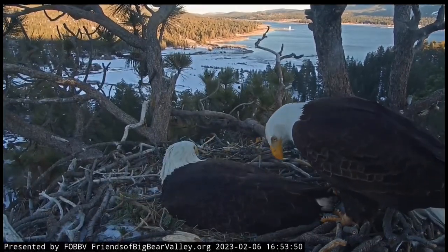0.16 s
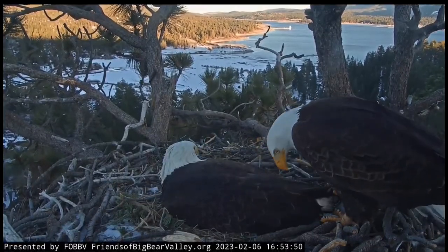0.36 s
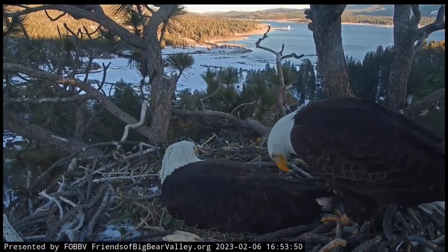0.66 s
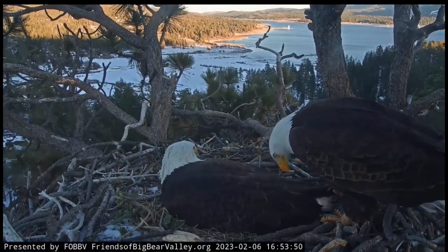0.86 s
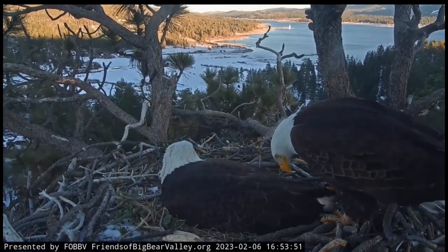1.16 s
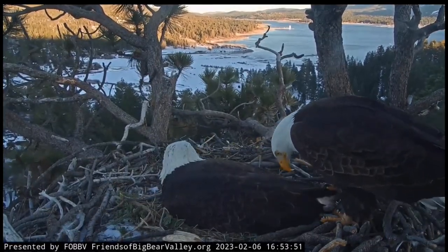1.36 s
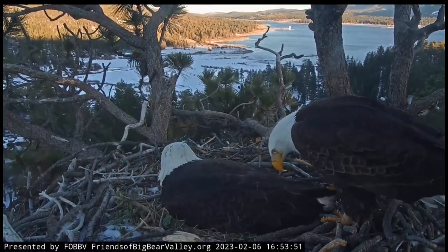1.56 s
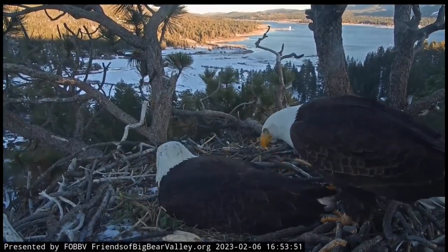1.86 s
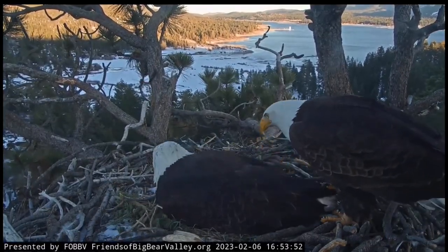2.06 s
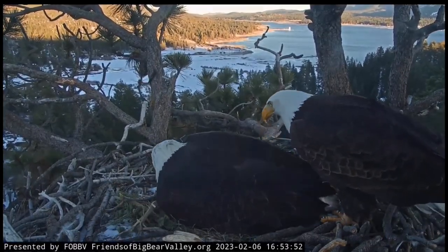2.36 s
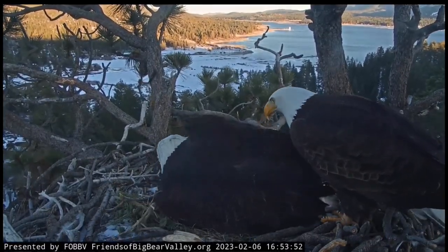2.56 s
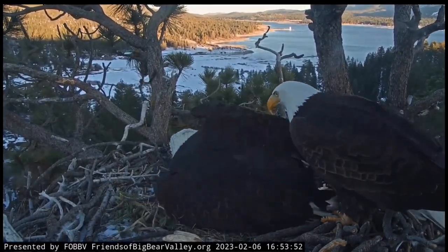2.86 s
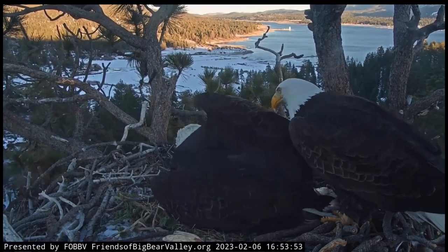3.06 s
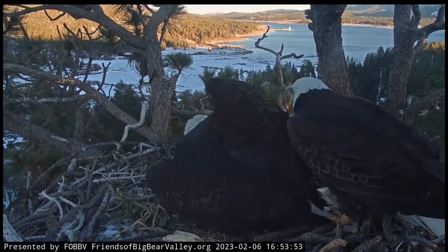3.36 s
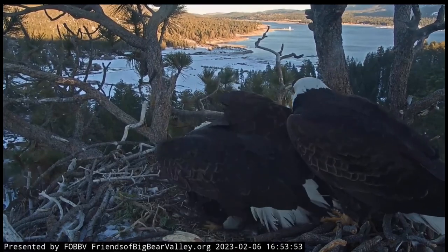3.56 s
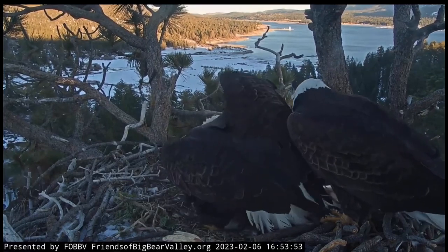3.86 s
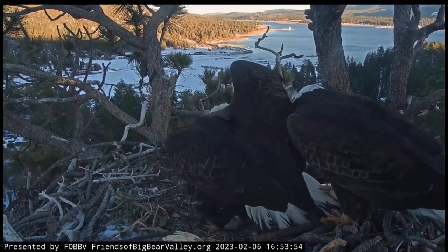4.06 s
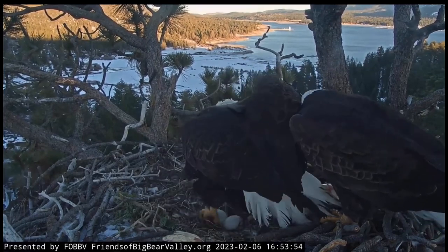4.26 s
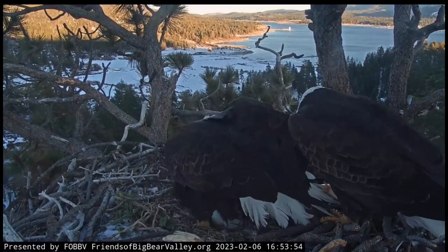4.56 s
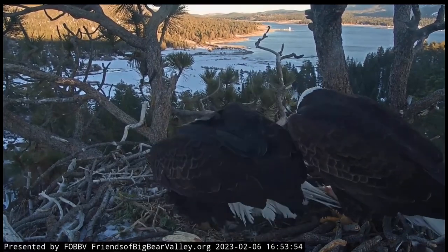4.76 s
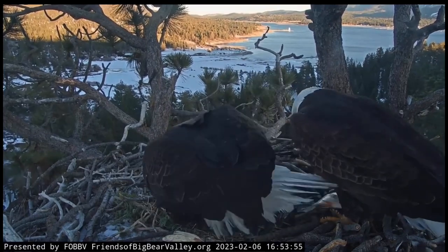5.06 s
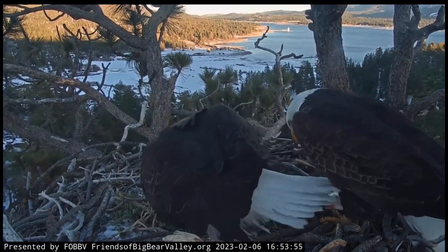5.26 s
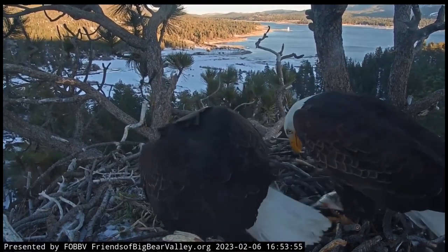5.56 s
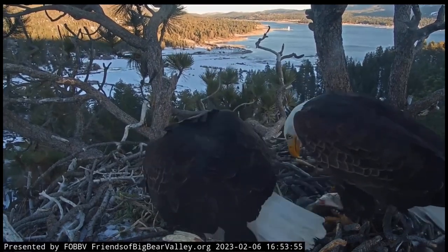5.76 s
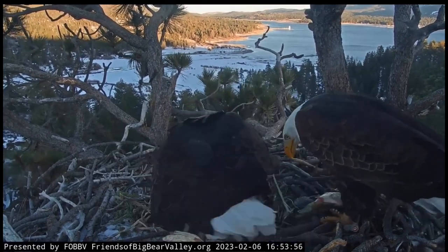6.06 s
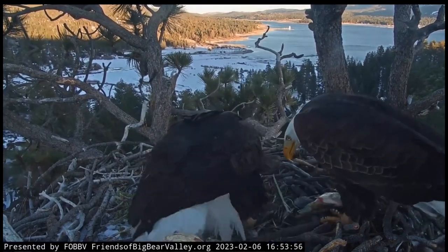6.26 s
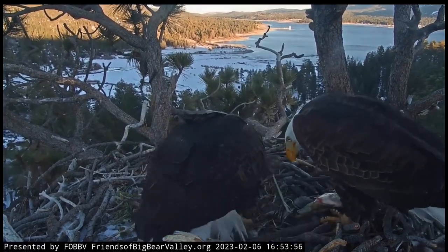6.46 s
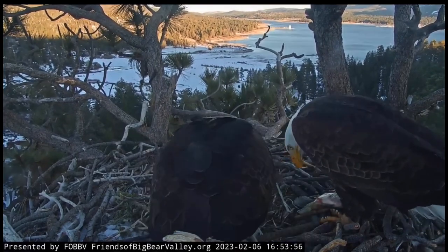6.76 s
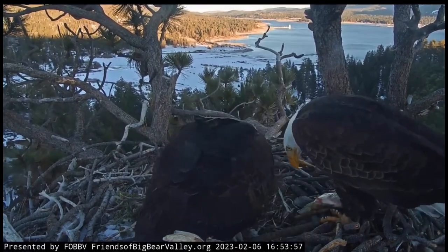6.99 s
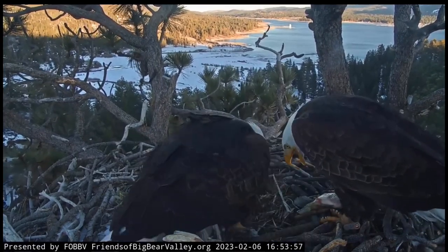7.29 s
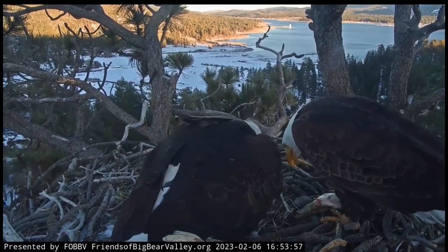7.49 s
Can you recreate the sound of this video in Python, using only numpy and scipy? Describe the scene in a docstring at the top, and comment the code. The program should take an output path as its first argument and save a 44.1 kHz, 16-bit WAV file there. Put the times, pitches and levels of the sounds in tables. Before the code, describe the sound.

Outdoor nest, heard very near: high nasal eagle whines with short gaps, smooth at first, then increasingly raspy. A mid-way cry cracks into a higher, ragged squeal, followed by soft chirps and crisp stick cracks. The calling resumes strongly, and a second eagle swells in at the end. Gentle wind and constant hiss continue throughout, with only a faint scattered tail from the trees and slight overload on the peaks.

```python
"""Two eagles at the nest

Two bald eagles call close to the nest microphone. One gives rising whines, each a stack of partials roughened
by a second, lower vibration; one whine breaks into a squeal, and the mate swells in under the last.
Soft falling chirps are gliding partials; sticks snap in bursts of noise as a bird turns round.
Soft wind and a steady hiss, both shaped noise, lie beneath; the loudest calls overload the microphone."""
import sys
import numpy as np
from scipy import signal
from scipy.fft import rfft, irfft, next_fast_len
from scipy.io import wavfile
from scipy.ndimage import map_coordinates

SR = 44100
rng = np.random.default_rng(int(sys.argv[2]) if len(sys.argv) > 2 else 0)


def to_wav(s):
    """Save 16-bit WAV."""
    ch = np.atleast_2d(s).T  # columns
    pcm = np.round(np.clip(ch, -1, 1) * 32767)  # PCM
    wavfile.write(sys.argv[1], SR, pcm.astype(np.int16))


N = 336476


def amp(db):
    """Decibels to gain."""
    return 10 ** (np.asarray(db) / 20)


def unit(x):
    """Scale to rms 1."""
    return x / np.sqrt(np.mean(x ** 2) + 1e-20)


def along(points, hz):
    """Read a value off (frequency, value) points, on a log frequency axis."""
    f, v = np.transpose(points)
    return np.interp(np.log(hz + 1), np.log(f + 1), v)


def curves(rows):
    """One value per sample for each column after the time."""
    s, *cols = np.transpose(rows)
    return [np.interp(np.arange(N) / SR, s, c) for c in cols]


def gate(start, end, fade):
    """1 between two times, with straight fades centred on them."""
    t = np.arange(N) / SR
    opening = np.clip((t - start) / fade + .5, 0, 1)
    closing = np.clip((end - t) / fade + .5, 0, 1)
    return opening * closing


def bump(s, length):
    """A smooth rise to 1 and back, centred on a time; length is the width at 1/e."""
    return np.exp(-(2 * (np.arange(N) / SR - s) / length) ** 2)


def wobble(rate):
    """A smooth random curve, rate knots a second."""
    knots = rng.standard_normal(int(N * rate / SR) + 4)
    return map_coordinates(knots, [np.arange(N) * rate / SR])


def filtered(x, response):
    """Multiply the spectrum of x by a response of frequency."""
    m = next_fast_len(N + SR // 2)
    return irfft(rfft(x, m) * response(np.fft.rfftfreq(m, 1 / SR)), m)[:N]


def noise(spectrum):
    """Coloured noise of rms 1."""
    return unit(filtered(rng.standard_normal(N), lambda hz: amp(along(spectrum, hz))))


def cycle(pitch):
    """Running phase of a vibration."""
    return 2 * np.pi * np.cumsum(pitch) / SR


def tone(phase):
    """A partial of rms 1."""
    return np.sqrt(2) * np.cos(phase)


def background(air_db=-33, hiss_db=-39):
    """Soft wind in the pines, mostly low noise, under a steady higher hiss."""
    # spectrum of the wind: (frequency [Hz], relative density [dB])
    air_spectrum = [(12, -37), (20, -0.5), (53, 1), (92, 0), (231, -8.5), (303, -9.5), (561, -6),
                    (908, -5.5), (1040, -7.5), (1240, -8), (1310, -10.5), (1620, -12.5), (2000, -22),
                    (2600, -54), (4400, -120)]
    # spectrum of the hiss: (frequency [Hz], relative density [dB])
    hiss_spectrum = [(1200, 2), (2000, 5.5), (2800, 6), (3700, 10), (4400, -4), (5100, -8.5), (6000, -17.5),
                     (7500, -20.5), (10000, -26.5), (14000, -24), (16000, -33.5)]
    wind = amp(air_db + 0.17 * wobble(1)) * noise(air_spectrum)
    hiss = amp(hiss_db + 0.4 * wobble(4.43)) * noise(hiss_spectrum)
    return wind + hiss


def forest(x):
    """Trunks and branches scatter a short tail: noise that dies away at its own rate in each band."""
    # decay of the tail: (frequency [Hz], time to fall 60 dB [s])
    decay_times = [(300, .3), (3000, 0.33), (10000, 0.052)]
    hz, t, z = signal.stft(rng.standard_normal(SR // 2), SR, nperseg=256)
    decay = amp(-60 * t / along(decay_times, hz)[:, None])
    tail = signal.istft(z * decay, SR, nperseg=256)[1]
    return signal.fftconvolve(x, tail / np.linalg.norm(tail))[:N]


def sticks(t60=0.031, level_db=-4):
    """Each dry twig gives one brief crack: noise with a sharp edge and a fast exponential decay."""
    # snaps at the nest: (time [s], relative level [dB])
    snaps = [(.763, -28), (2.399, -32), (4.416, -18.5), (4.778, -26.5), (5.317, -18.5), (5.336, -11.5),
             (6.798, -26)]
    # colour of breaking wood: (frequency [Hz], relative density [dB])
    stick_spectrum = [(300, -23), (1200, -7.5), (2200, -11.5), (3600, -1), (5000, -17), (7500, -28),
                      (11000, -46.5), (15000, -53.5)]
    t, blows = np.arange(N) / SR, np.zeros(N)
    for s, db in snaps:
        age = np.maximum(t - s, 0)
        edge = 1 - np.exp(-age / 0.00024)
        blows += amp(db - 60 * age / t60) * edge
    return amp(level_db) * blows * noise(stick_spectrum)


def chirps():
    """Short, soft notes of three partials that slide down with a ragged pitch and level."""
    # falling notes: (start [s], length [s], start pitch [Hz], end pitch [Hz],
    # first partial [dB], second partial [dB], third partial [dB])
    notes = [(4.227, 0.025, 1327, 1078, -33, -28, -30), (4.654, 0.022, 3800, 3560, -38.5, -68, -85),
             (5.139, 0.046, 4040, 3430, -30, -67, -83), (5.196, 0.039, 1333, 1103, -30, -28, -36)]
    t, out = np.arange(N) / SR, np.zeros(N)
    for s, length, start_hz, end_hz, *partials in notes:
        pitch = np.interp(t, [s, s + length], [start_hz, end_hz])
        phase = cycle(pitch * (1 + 0.02 * wobble(660)))
        swell = gate(s, s + length, fade=length / 5) * amp(4.8 * wobble(150))
        out += swell * sum(amp(db) * tone(k * phase) for k, db in enumerate(partials, 1))
    return out


def glide(start, end, onset_hz, low_hz, top_hz, bend, scoop_hz):
    """Pitch of a call: it settles, scoops, climbs as the bird presses and drops as it lets go."""
    settle_s, scoop_at_s, scoop_width_s = .05, .09, 0.041
    drop_s, drop_share = .055, .15
    t = np.arange(N) / SR
    age = np.maximum(t - start, 0)
    climb = np.clip(age / (end - start - drop_s), 0, 1) ** bend
    settling = onset_hz * np.exp(-age / settle_s)
    scoop = scoop_hz * np.exp(-((age - scoop_at_s) / scoop_width_s) ** 2)
    letting_go = np.clip((t - end) / drop_s + 1, 0, 1) ** 2
    return (low_hz + (top_hz - low_hz) * climb + settling - scoop) * (1 - drop_share * letting_go)


def whine(pitch, effort_db, rasp_db, share, low_db, partial_db, jitter, low_jitter=0.0422, shimmer_db=1.02,
          side_db=-0.87, flutter_db=2, waver=0.001454):
    """The syrinx sings a clean stack; under strain a second vibration adds fuzzy side tones between partials."""
    # fixed resonances that the first three partials glide through: (frequency [Hz], gain [dB])
    throat = [(1075.0, -11.7), (1130.0, -3.2), (1185.0, -1.5), (1250.0, -3.9), (1330.0, 3.6), (1410.0, 1.7),
              (2150.0, -1.9), (2250.0, -4.9), (2320.0, -11.2), (2400.0, -9.9), (2480.0, -6.9),
              (2600.0, -4.4), (2700.0, 4.2), (2800.0, 7.2), (3220.0, -2.2), (3600.0, -6.8), (4250.0, -5.9)]
    # slope of the fourth to tenth partials: (frequency [Hz], relative level [dB])
    overtone_slope = [(4350, -16.5), (4800, -21.5), (5400, -29), (6100, -39), (7000, -40.5), (8200, -50),
                      (10000, -59), (13000, -68.5)]
    # mixtures of both vibrations: (multiple of the pitch [-], sign of the low voice [-], relative level [dB])
    side_tones = [(1, 1, -13.5), (2, -1, -11.5), (2, 1, 0), (3, -1, -3), (3, 1, -24.5), (4, -1, -19.5),
                  (4, 1, -29.5), (5, 1, -38), (6, 1, -43.5), (7, 1, -48.5)]
    # rush of breath through the voice: (frequency [Hz], relative density [dB])
    breath_spectrum = [(300, -30), (600, -10), (1100, -12), (2000, -6), (2600, -6), (3200, 0), (3900, -4),
                       (4500, -20), (5500, -36), (9000, -52)]
    easy_db, second_grows = -23, 0.18  # easy effort; dB that the second partial gains per dB above it
    side_flutter_db = 3.8

    second_db, third_db, overtones_db = partial_db
    strain = np.clip(amp(rasp_db) / 2, 0, 1)
    phase = cycle(pitch * (1 + waver * wobble(40) + (jitter + 0.012 * strain) * wobble(450)))

    stack = amp(along(throat, pitch)) * tone(phase)
    second_db = second_db + second_grows * (effort_db - easy_db) + 2.0 * wobble(22)
    stack += amp(along(throat, 2 * pitch) + second_db) * tone(2 * phase + np.pi / 2)
    stack += amp(along(throat, 3 * pitch) + third_db + flutter_db * wobble(60)) * tone(3 * phase)
    for k in range(4, 11):
        ripple_db = 3.8 * wobble(16) + 2.5 * wobble(110)
        stack += amp(along(overtone_slope, k * pitch) + overtones_db + ripple_db) * tone(k * phase)

    # strain unsettles the low vibration, and each side tone flutters on its own
    low_waver = low_jitter * (0.33 + np.sqrt(strain)) * wobble(350) + 0.00814 * wobble(45)
    low = cycle(pitch * share * (1 + low_waver))
    sides = np.zeros(N)
    for k, way, db in side_tones:
        sides += amp(db + side_flutter_db * wobble(300)) * tone(round(k) * phase + np.sign(way) * low)
    turbulence = amp(-15) * noise(breath_spectrum)
    rasp = amp(side_db) * (sides + amp(low_db) * tone(low)) + turbulence
    return amp(effort_db) * (stack * amp(shimmer_db * wobble(250)) + amp(rasp_db) * rasp)


def mate(pitch_hz=1338, sag_hz_per_s=40, swell_s=.24, effort_db=-13, rasp_db=-13, share=.49, low_db=-15,
         second_db=-2, third_db=-3, overtones_db=-5, jitter=.0022):
    """The second bird swells in under the last whine and holds its note, sagging a little."""
    start_s = 7.27
    age = np.maximum(np.arange(N) / SR - start_s, 0)
    pitch = pitch_hz - sag_hz_per_s * (age - swell_s)  # pitch_hz is reached as the swell ends
    partial_db = (second_db, third_db, overtones_db)
    voice = whine(pitch, effort_db, rasp_db, share, low_db, partial_db, jitter)
    return np.minimum(age / swell_s, 1) * voice


def squeal(jitter=0.0029, side_db=-29, below_db=-12, half_db=-31, rasp_db=-26):
    """The voice breaks up a fifth and locks to the low vibration, which adds side tones at thirds of the pitch."""
    # course of the squeal: (time [s], first partial [dB], second partial [dB])
    squeal_levels = [(3.651, -35, -36.5), (3.668, -15.5, -6.5), (3.755, -12.5, -5.5), (3.78, -20, -5),
                     (3.8, -34.5, -17), (3.875, -12.5, -18.5), (3.995, -5, -6), (4.06, -1, -22.5),
                     (4.1, -3, -6.5), (4.197, -0.5, -17.5), (4.224, -2.5, -5.5), (4.247, -37.5, -45.5)]
    # moments when the side tones flare: (time [s], length [s], gain [dB])
    flares = [(3.738, 0.049, 20), (3.857, .06, 12), (3.988, 0.088, 17.5), (4.072, .03, 25)]
    # time limits of the squeal: (start [s], end [s])
    span = (3.651, 4.244)
    # pitch course: (onset above low [Hz], low [Hz], top [Hz], bend of the rise [1 = straight], scoop [Hz])
    pitch_shape = (35, 1957, 2256, 1.4, 3.3)
    first_db, second_db = curves(squeal_levels)
    phase = cycle(glide(*span, *pitch_shape) * (1 + jitter * wobble(500)))
    loud = np.hypot(amp(first_db), amp(second_db))
    stack = amp(first_db) * tone(phase) + amp(second_db) * tone(2 * phase)
    overtones = amp(-38) * tone(3 * phase) + amp(-46) * tone(4 * phase)

    third = phase / 3 + .25 * wobble(250)
    around_first = tone(phase + third) + amp(-12.0) * tone(phase - third + np.pi)
    around_second = tone(2 * phase - third) + amp(-32) * tone(2 * phase + third)
    flare_db = sum(db * bump(s, length) for s, length, db in flares)
    sides = amp(flare_db) * (amp(below_db) * around_first + around_second)

    # later the period also doubles, with weak lines halfway
    halfway = tone(phase + phase / 2) + amp(-20.5) * tone(phase / 2) + amp(-13) * tone(2 * phase + phase / 2)
    halves = gate(3.83, 4.22, fade=0.02) * halfway
    # over the same stretch the side tone below the second partial turns ragged
    ragged = gate(3.81, 4.3, fade=0.04) * wobble(620) * tone(2 * phase - third)

    voice = stack + loud * overtones + amp(side_db + wobble(200)) * sides
    voice += amp(half_db) * halves + amp(rasp_db) * ragged
    return gate(*span, fade=.006) * voice


def eagle(low_db=-17, jitter=0.0032):
    """The first bird's run of whines: pitch, effort, beak opening, rasp and low voice move through each."""
    # whines: (start [s], end [s], onset above low [Hz], low [Hz], top [Hz], bend of the rise [1 = straight],
    # scoop [Hz], rasp at start [relative dB], rasp at end [relative dB], low voice at start [share of pitch],
    # low voice at end [share of pitch], second partial [dB], overtones [dB], last push [dB])
    whine_rows = [(-.2, 0.643, 5.5, 1095, 1183, 1.45, -1, -30.5, -19, 0.76, .54, -0.94, 0, 0),
                  (1.019, 1.873, 104, 1068, 1199, 1.7, 0.5, -31.5, -38.5, 0.49, .7, -0.11, -1, 0),
                  (2.258, 3.012, 52, 1142, 1328, 0.82, 50.5, -21.5, -9, .42, .52, -0.81, -3, -2.5),
                  (3.417, 3.797, 44.5, 1194, 1305, 1.42, 11.5, -10.5, -11, .37, .62, 1, 0.63, -2),
                  (5.529, 6.474, 67.5, 1265, 1409, 1.7, 55.5, -10, -8, .41, .52, 0.73, 0, 2.5),
                  (6.803, 7.529, 129, 1144, 1400, 1.15, -1.5, -18, -5.5, 0.42, .54, 0.27, -2, 3.5)]
    # one curve per whine: (time [s], effort [dB], beak opening as gain of the third partial [dB])
    gestures = [
        [(0.0, -24, 2), (0.12, -19.2, 1.3), (0.19, -20.5, -7), (0.33, -18, 0.5), (0.51, -17.5, 2.5),
         (0.55, -15, -9.5), (0.61, -18, -1.5)],
        [(1.03, -16.5, -12), (1.09, -24.5, 6), (1.15, -26, 9), (1.35, -23.5, -1), (1.52, -22, 0.2),
         (1.72, -17.8, 3), (1.85, -17, -1)],
        [(2.27, -20.5, -8), (2.31, -24.5, 4), (2.4, -23.5, -4.0), (2.6, -27, 8), (2.77, -24.5, -11),
         (2.85, -25.5, 4), (2.98, -26, -4.5)],
        [(3.43, -23, 4.5), (3.47, -23.5, 7), (3.52, -26, 6.5), (3.66, -29, 11.5)],
        [(5.54, -21, 1.3), (5.57, -13, 0), (5.61, -18.5, 0), (5.78, -18, 2.7), (5.98, -20.5, -0.3),
         (6.15, -23, 1.8), (6.23, -18.5, 7), (6.32, -16.5, -6.8), (6.44, -14.5, 2.5)],
        [(6.81, -15.5, -2), (6.83, -11, 1), (6.92, -17.5, 4.2), (7.01, -17.5, -5.5), (7.13, -12, 6),
         (7.2, -13, -2.5), (7.3, -15, 6), (7.42, -17.5, 4.5), (7.49, -11.5, -3)],
    ]
    # the voice cracks: (time [s], length [s], rasp gain [dB], low voice gain [dB])
    cracks = [(3.559, 0.13, 5.5, 21), (7.339, 0.11, 13.5, 4.5), (7.424, 0.1, 13.5, 2.5)]
    attack_s, release_s = 0.017, 0.029
    unsteady_s, unsteady_jitter = 0.039, 0.0098  # both ends are ragged: decay time, share of the pitch
    push_lead_s, push_s = 0.059, 0.21  # the last push peaks this long before the end; its length

    t, rows = np.arange(N) / SR, np.array(whine_rows)
    current = rows[np.maximum(np.searchsorted(rows[:, 0], t) - 1, 0)].T  # the latest whine at each sample
    (start, end, *shape, rasp_from, rasp_to, share_from, share_to,
     second_db, overtones_db, last_push_db) = current
    progress = np.clip((t - start) / (end - start), 0, 1)
    sounding = np.clip((t - start) / attack_s, 0, 1) * np.clip((end - t) / release_s, 0, 1)
    nearest_end = np.minimum(abs(t - start), abs(end - t))
    unsteady = unsteady_jitter * np.exp(-nearest_end / unsteady_s)

    effort_db, beak_db = curves([point for gesture in gestures for point in gesture])
    push_db = last_push_db * bump(end - push_lead_s, push_s)
    # a stronger push is purer, a slackening one raspier
    rasp_db = rasp_from + (rasp_to - rasp_from) * progress - 2 * push_db
    rasp_db += sum(db * bump(s, length) for s, length, db, _ in cracks)
    low_voice_db = low_db + sum(db * bump(s, length) for s, length, _, db in cracks)
    share = share_from + (share_to - share_from) * progress
    partial_db = (second_db, beak_db - push_db, overtones_db)
    pitch = glide(start, end, *shape)
    return sounding * whine(pitch, effort_db + push_db, rasp_db, share, low_voice_db, partial_db,
                            jitter + unsteady)


def scene():
    """Both birds and the nest close by, a faint tail from the trees, and the background."""
    near = sticks() + chirps() + mate() + squeal() + eagle()
    return (background() + amp(-33.0) * forest(near) + near)[None]


def record(dry):
    """The microphone overloads at its ceiling, dulls the top and keeps nothing above its band limit."""
    # treble response of the microphone: (frequency [Hz], gain [dB])
    treble = [(10000, 0), (14000, -3), (15500, -12)]
    ceiling, top_hz = .93, 15574
    fine = signal.resample_poly(dry[0], 4, 1)  # clipping at four times the rate limits aliasing
    clipped = signal.resample_poly(np.clip(fine, -ceiling, ceiling), 1, 4)
    return filtered(clipped, lambda hz: amp(along(treble, hz)) * (hz < top_hz))[None]


dry = scene()
out = record(dry)
to_wav(out)
```